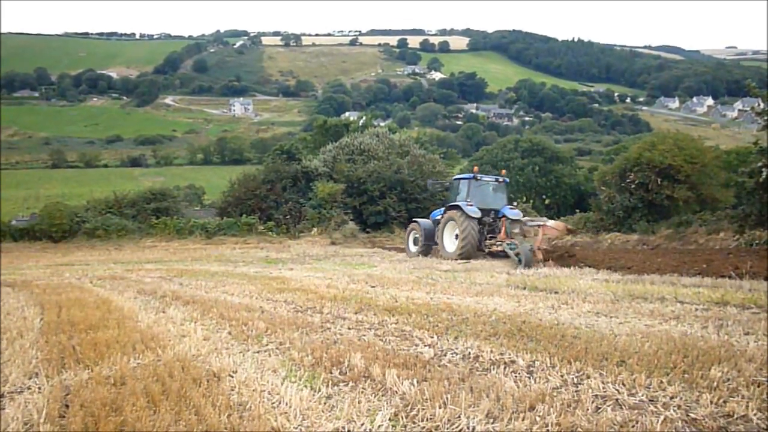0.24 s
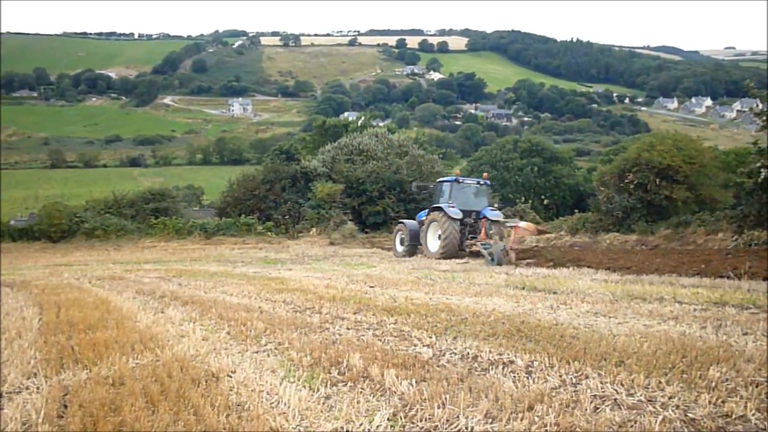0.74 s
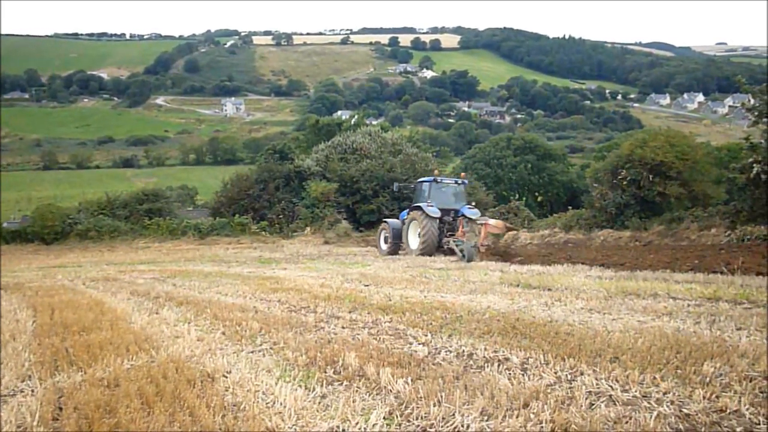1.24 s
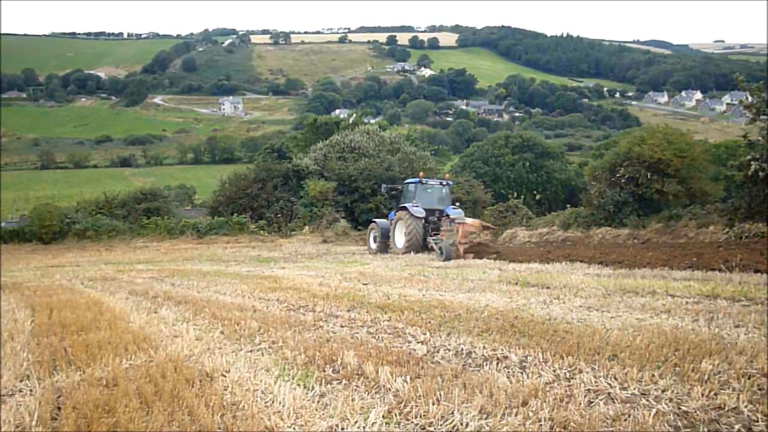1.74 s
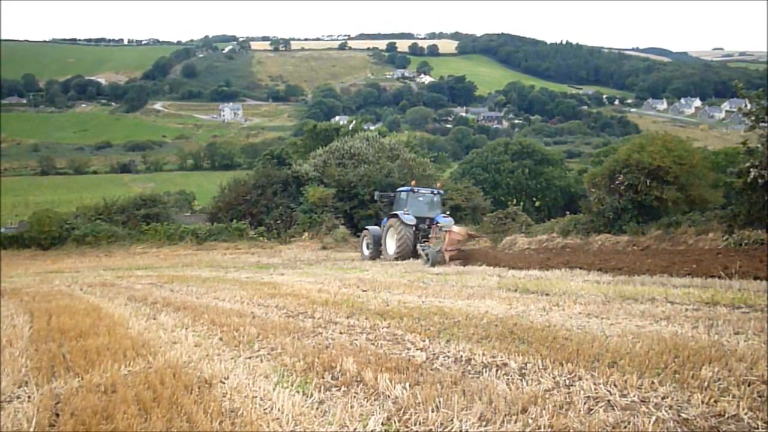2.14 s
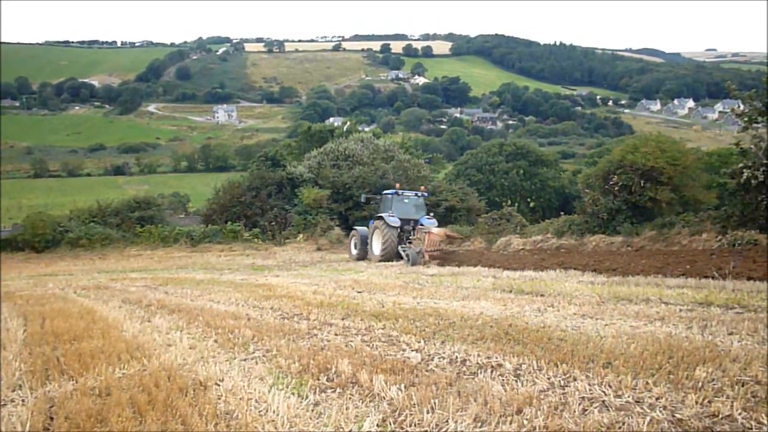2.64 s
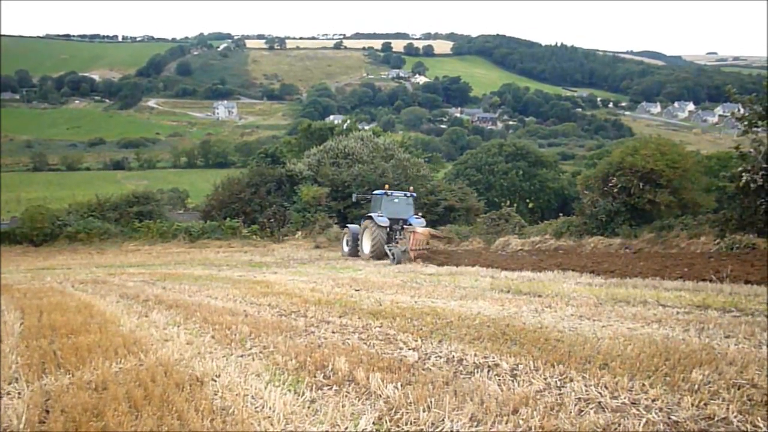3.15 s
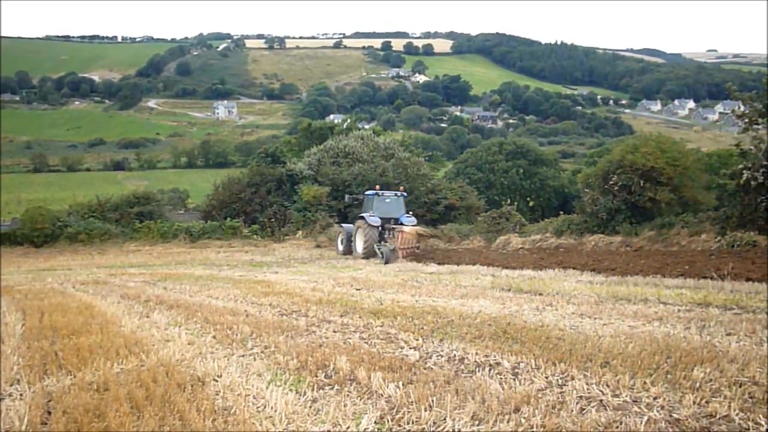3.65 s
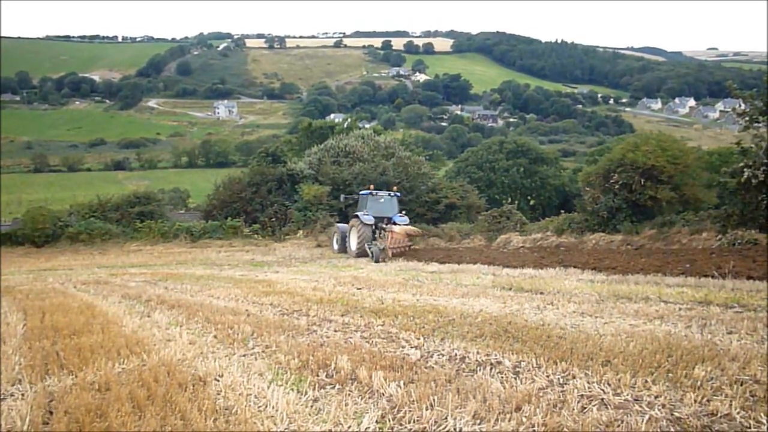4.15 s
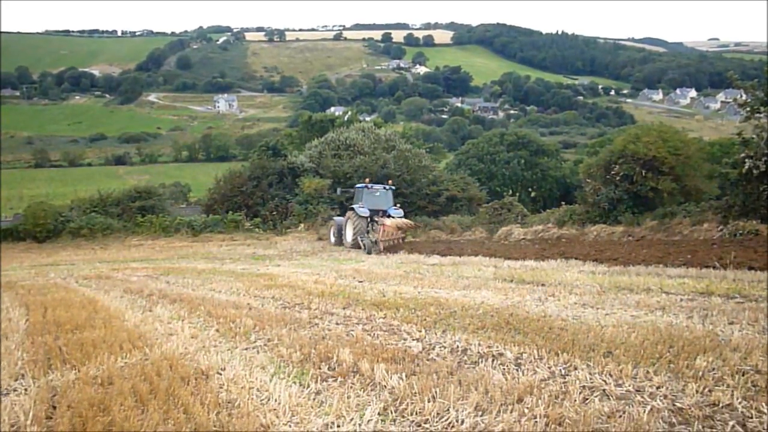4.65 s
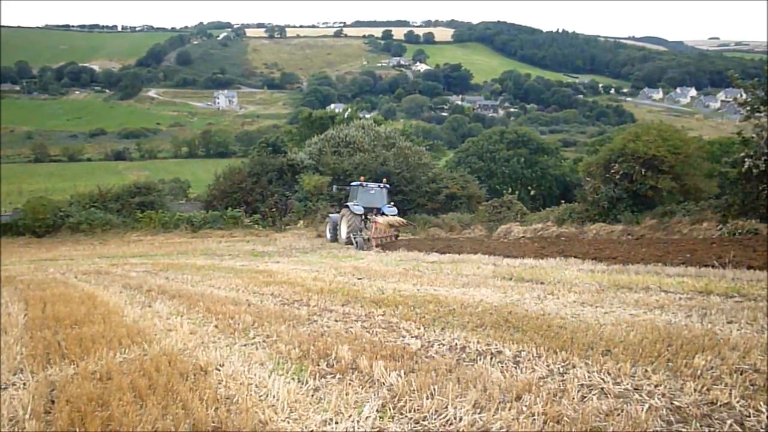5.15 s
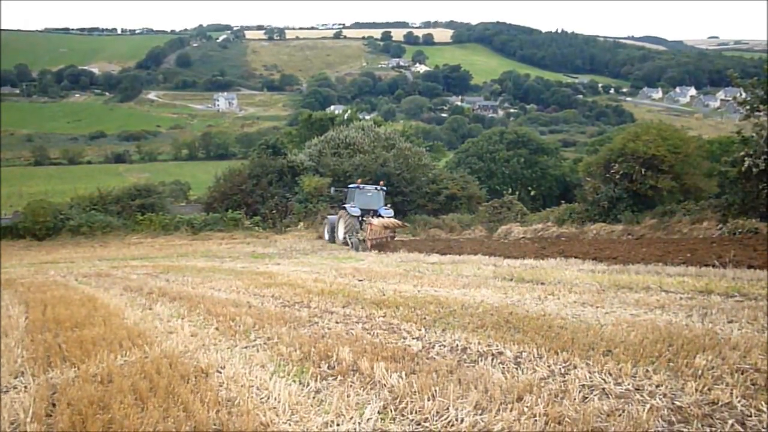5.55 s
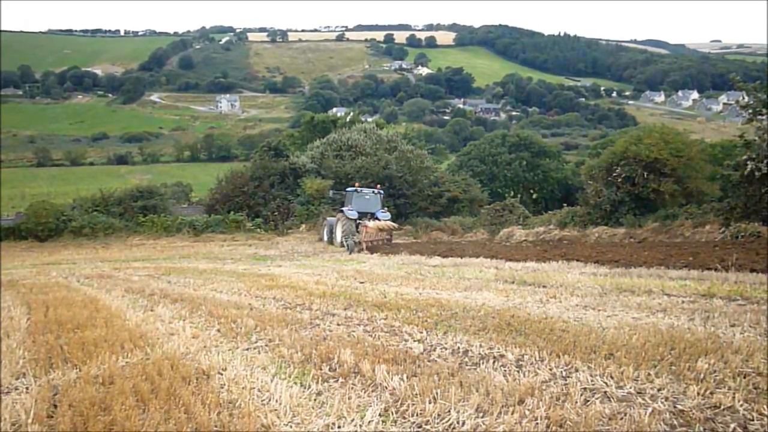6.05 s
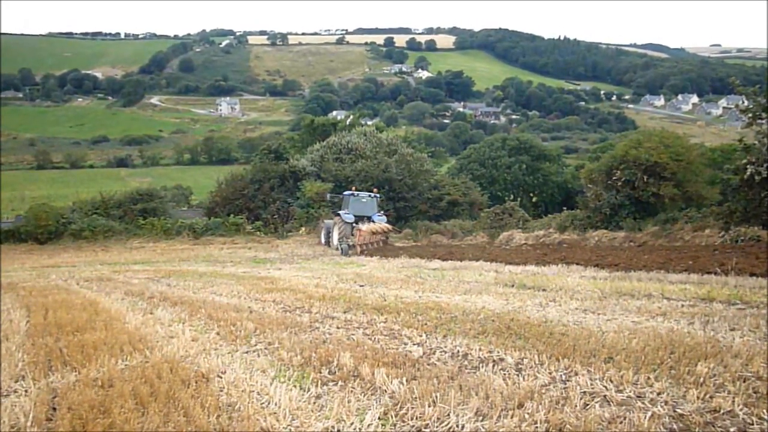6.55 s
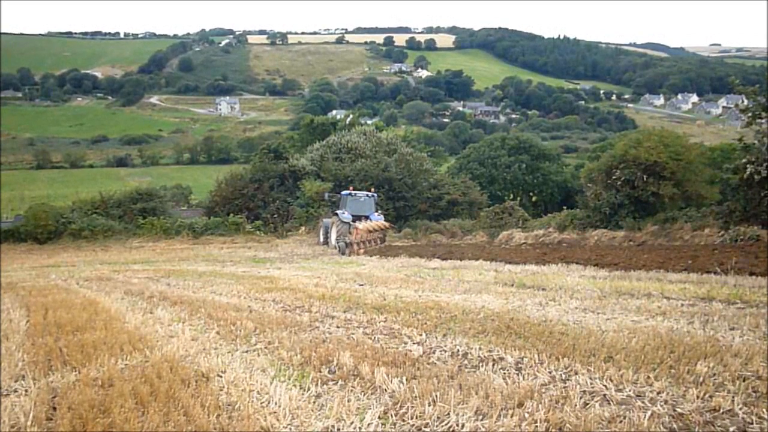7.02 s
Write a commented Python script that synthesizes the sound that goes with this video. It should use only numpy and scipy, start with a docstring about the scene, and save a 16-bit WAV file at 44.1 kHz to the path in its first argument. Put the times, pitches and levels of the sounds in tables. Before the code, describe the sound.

From the start a diesel tractor is already working hard about 25 metres away in an open field, a deep droning boom near 85-90 hertz with a rough roar and clattering block. Soil hisses and crumbles over the plough throughout. A heavier boom and stony scrape come at 0.7 s; the engine picks up slightly around 1.2, sags near 2.4 and recovers by 3. Short gritty stone knocks stand out at 3.1, 3.6, 4.6 and 5.1 s. The tractor gradually recedes, its roar changing colour as its rear turns towards the listener. Light wind freshens after 4 s, with low thumps clustered around 4.8-5.5, 6.0 and 7.0, the strongest at 5.3. From about 6.1 s the throttle eases: a brief higher hum sings at 6.4, pitch falls, and drone, clatter and soil fade until the end at 7.3. The small camera sounds narrow, with dull treble.

```python
"""In a stubble field, a six-cylinder diesel tractor pulls a plough away from the listener.
Its speed sags and recovers with the load until the driver throttles back. The exhaust drones as sine tones
and booming noise, and noise that swells at each firing makes the roar and the clattering block.
Crumbling noise hisses over the plough shares, and grains of noise ring them where they strike stones.
A freshening breeze buffets the microphone of a small camera with a narrow, notched response."""
import sys
import numpy as np
from scipy.fft import rfft, irfft, next_fast_len
from scipy.io import wavfile
from scipy.ndimage import map_coordinates

SR = 44100
rng = np.random.default_rng(int(sys.argv[2]) if len(sys.argv) > 2 else 0)


def master_out(mix):
    """Clip the mix to full scale and print it as 16-bit PCM to the path in sys.argv[1]."""
    frames = np.transpose(np.atleast_2d(mix))
    ceiling = np.clip(frames, -1, 1)
    pcm = np.round(ceiling * 32767).astype(np.int16)
    wavfile.write(sys.argv[1], SR, pcm)


N = 321048
CYLINDERS = 6
# how fast each sound dies away once the driver throttles back, in dB per second; clatter fades like the soil
BOOM_FADE, ROAR_FADE, SOIL_FADE = 12.3, 4.5, 7.5
SOIL_DB = -42.0  # soil level at the starting distance, in dB
FACING_DB_PER_S = 0.2447  # clatter and soil gain as the tractor's rear swings round towards the listener

# The firing note. Each row: time in seconds, level in dB.
NOTE_LEVELS = [(0, -28.5), (0.45, -27.5), (1.2, -27.5), (1.5, -31.5), (2.5, -29.5), (2.8, -33),
               (3.05, -28.5), (3.5, -30.5), (3.85, -33), (4.75, -32.5), (5.2, -36.5), (6.05, -32.5),
               (6.5, -50.5), (7.28, -55)]
# Exhaust tones. Each row: multiple of the four-stroke cycle, level in dB compared with the boom.
EXHAUST_TONES = [(8, -27), (10, -12.5), (11, -12), (12, -3), (13, -22), (14, -21), (15, -21), (16, -26),
                 (18, -16), (20, -22), (22, -26), (34, -27), (36, -30), (40, -35), (54, -29), (60, -31.5),
                 (66, -31), (78, -25.5)]
# Colour of the gas booming in the silencer. Each row: frequency in Hz, strength in dB per Hz.
BOOM_COLOUR = [(30, -42), (80, -11), (115, -4.5), (150, 1), (180, -5.5), (215, -5), (270, -13.5),
               (380, -27.5), (700, -53.5)]
BOOM_DB, OVERTONE_DB = -24, -47.5  # levels at the starting distance
FREE_HZ, FULL_LOAD_HZ = 88.8, 86.5  # firings per second running light and pulling hard
LOAD_DB = 2  # extra boom when pulling hard
HEAVY_S, HEAVY_LENGTH_S, HEAVY_DB = 0.73, 0.29, 2  # a heavy patch of ground makes the exhaust boom
SING_S, SING_LENGTH_S, SING_DB = 6.4, 0.23, 11  # the fourth harmonic sings out as the engine slows


def exhaust(cycle, firing_hz):
    """Firing note, its overtone, tones of unequal cylinders, and gas that booms harder under load."""
    load = np.clip((FREE_HZ - firing_hz) / max(FREE_HZ - FULL_LOAD_HZ, 1), 0, 1)
    note_db, = curves(NOTE_LEVELS)
    boom_db = level(BOOM_DB, BOOM_FADE) + LOAD_DB * load
    boom_db = boom_db + HEAVY_DB * swell(HEAVY_S, HEAVY_LENGTH_S) + .7 * wobble(22)
    overtone_db = level(OVERTONE_DB, ROAR_FADE) + SING_DB * swell(SING_S, SING_LENGTH_S)
    note = tone(cycle, CYLINDERS, waver_db=0.8, drift=0.23)
    overtone = tone(cycle, 4 * CYLINDERS, waver_db=1, drift=0.3)
    tones = np.zeros(N)
    for order, db in EXHAUST_TONES:
        # the higher the order, the more the air shakes it, up to a limit
        waver_db = min(order * 0.11, 3)
        drift = min((order / 32) ** 2, 1)
        tones += amp(db) * tone(cycle, round(order), waver_db, drift)
    gas = coloured(bursts(cycle, depth=0.25), BOOM_COLOUR)
    boom = tones + amp(-8.5) * gas
    return amp(note_db) * note + amp(overtone_db) * overtone + amp(boom_db) * boom


# Belt-driven fan and pump. Each row: multiple of the four-stroke cycle, level in dB compared with the roar.
BELT_TONES = [(11.25, -1.5), (24.9, -17)]
# Colour of the ringing block. Each row: frequency in Hz, strength in dB per Hz.
CLATTER_COLOUR = [(800, -14), (1500, -5), (1900, 7), (2300, -0.5), (2570, 7.5), (2810, -10.5), (3050, 5.5),
                  (3400, -5.5), (3700, 1.5), (4100, -13), (5000, -9.5), (7500, -43.5)]
ROAR_DB, CLATTER_DB = -30.5, -40  # settings for the starting distance


def machinery(cycle):
    """Knocks that recur each cycle blend with turbulent roar, belt-driven tones and the ringing block."""
    roar_db = level(ROAR_DB, ROAR_FADE)
    clatter_db = level(CLATTER_DB, SOIL_FADE) + FACING_DB_PER_S * np.arange(N) / SR
    knocks = sum(tone(cycle, order, waver_db=3, drift=.7) for order in range(16, 96))
    roar = roar_colour(bursts(cycle, depth=0.15) + amp(-15) * unit(knocks))
    belt = sum(amp(db) * tone(cycle, order, waver_db=1.5, drift=.4) for order, db in BELT_TONES)
    clatter = coloured(bursts(cycle, depth=0.07), CLATTER_COLOUR) * amp(1.1 * wobble(14))
    return amp(roar_db - 1.0) * roar + amp(roar_db) * belt + amp(clatter_db) * clatter


# Roar heard from the tractor's flank. Each row: frequency in Hz, strength in dB per Hz.
FLANK_COLOUR = [(100, -17), (250, -4.5), (340, 2), (410, 0), (490, 2.5), (570, -1.5), (720, 4), (820, -3),
                (930, -0.5), (1050, -1.5), (1180, 1), (1400, -3), (2000, -3.5), (4000, -33.5)]
# Roar heard from behind. Each row: frequency in Hz, strength in dB per Hz.
REAR_COLOUR = [(100, -21), (250, 8), (340, -2.5), (410, 2), (490, 2), (660, 4.5), (780, -4.5), (910, 4),
               (1040, -1), (1170, 3.5), (1320, -3.5), (2000, -15.5), (4000, -36)]


def roar_colour(source):
    """The colour of the roar shifts steadily as the tractor turns its back."""
    away = np.linspace(0, 1, N)
    flank = coloured(source, FLANK_COLOUR)
    rear = coloured(source, REAR_COLOUR)
    return unit((1 - away) * flank + away * rear)


# Colour of the soil hiss. Each row: frequency in Hz, strength in dB per Hz.
SOIL_COLOUR = [(800, -15.5), (2000, 4.5), (3500, 4.5), (4800, 2.5), (5600, 1), (6400, 0.5), (7100, -3.5),
               (7600, -12), (8000, -30)]


def plough():
    """Soil and stubble crumble over the shares in uneven clods, as noise of jumpy strength."""
    soil_db = level(SOIL_DB, SOIL_FADE) + FACING_DB_PER_S * np.arange(N) / SR
    unevenness_db = 1.14 * wobble(25) + 0.51 * wobble(5.2)
    crumbs = rng.standard_normal(N) * amp(1.6 * wobble(500))
    return amp(soil_db + unevenness_db) * coloured(crumbs, SOIL_COLOUR)


# Large stones scraping over the shares. Each row: start in seconds, average (rms) level in dB at the top,
# centre in Hz, spread in octaves, time to the top in seconds.
LARGE_STONES = [(0.085, -35, 4400, .45, .004), (0.704, -31.5, 1500, 1.6, .006),
                (0.723, -26.5, 1150, 1.6, .008), (1.212, -38, 2800, .4, .004),
                (1.817, -40.5, 5000, .13, .006), (3.012, -40, 1850, .2, .005),
                (3.1, -33.5, 3500, .5, .0025), (3.118, -28, 3000, .85, .0035), (3.197, -38, 5200, .4, .006),
                (3.553, -33.5, 1500, 1, .006), (4.025, -37, 3700, .12, .004), (4.195, -40, 3800, .6, .02),
                (4.421, -37, 2500, .4, .004), (4.553, -38, 2600, .2, .009), (4.606, -32.5, 3700, 1, .006),
                (4.637, -34.5, 3800, .6, .0035), (5.065, -35.5, 4300, .22, .004),
                (5.121, -35.5, 2500, .5, .005), (5.198, -38, 2500, .6, .005), (5.795, -41, 4200, .4, .012),
                (5.99, -42, 4200, .4, .005), (6.32, -42, 3700, .4, .003), (6.352, -37, 2500, .4, .004),
                (6.4, -43, 3500, .4, .004), (6.469, -39, 2550, .2, .004), (6.83, -46, 3500, .4, .004),
                (7.215, -43, 2800, .4, .006)]


def stones():
    """Large stones scrape over the shares, with 45 small pebbles at random times between them."""
    track = np.zeros(N)
    soil_db = level(SOIL_DB, SOIL_FADE)
    for start, db, centre_hz, spread, rise in LARGE_STONES:
        add(track, start, amp(db) * scrape(centre_hz, spread, rise))
    for when, weight, pitch in rng.random(size=(45, 3)):
        db = soil_db[int(when * N)] - 7 + 5 * weight
        pebble = scrape(2400 + 3000 * pitch, spread=.4, rise=0.0046)
        add(track, when * N / SR, amp(db) * pebble)
    return track


# Ringing of the soil-damped shares and their frame. Each row: frequency in Hz, width in Hz, strength in dB.
SHARE_RINGING = [(520, 160, 5), (790, 160, 3), (1170, 160, 1), (1830, 120, 2), (2570, 130, -2),
                 (3090, 150, 1), (3720, 170, -2), (4290, 200, -4), (4680, 170, -7), (5080, 180, -9),
                 (5450, 170, -8), (6350, 260, -14)]


def scrape(centre_hz, spread, rise):
    """A stone grinds briefly over a share and rings mostly the modes within spread octaves of its centre."""
    t = np.arange(SR // 8) / SR
    hz = np.fft.rfftfreq(len(t), 1 / SR)
    steel = 0
    for mode_hz, width_hz, db in SHARE_RINGING:
        closeness = np.exp(-.5 * (np.log2(mode_hz / centre_hz) / spread) ** 2)
        steel = steel + amp(db) * closeness * resonance(hz, mode_hz, width_hz)
    air = 1 / (1 + (hz / 6800) ** 6)  # takes off the top treble
    pressure = t / rise * np.exp(1 - t / rise)  # peaks at 1 after the rise time
    grit = rng.standard_normal(len(t)) * amp(8 * rng.standard_normal(len(t)))
    ring = irfft(rfft(grit * pressure) * steel * air, len(t))
    return unit(ring) * np.sqrt(np.mean(pressure ** 2))


def resonance(hz, centre_hz, width_hz):
    """Response of one damped mode, 1 at its centre."""
    return 1j * hz * width_hz / (centre_hz ** 2 - hz ** 2 + 1j * hz * width_hz)


# Puffs on the microphone. Each row: start in seconds, peak in dB, pitch in Hz reached 3 ms after the start.
WIND_PUFFS = [(0.764, -15, 150), (4.126, -18, 95), (4.206, -15.5, 125), (4.424, -17, 72),
              (4.807, -16.5, 260), (4.827, -15, 130), (4.888, -19, 170), (4.988, -19, 75), (5.013, -17, 95),
              (5.282, -10.5, 215), (5.295, -17, 95), (5.524, -13, 120), (6.01, -17, 85), (6.041, -14, 90),
              (6.09, -18, 120), (6.122, -15, 220), (6.973, -14.5, 125), (6.991, -15.5, 135)]
PUFF_SWINGS, PUFF_T60_S = 14, .08  # swings, and seconds, that each take 60 dB off a puff; both act together


def wind():
    """Low buffeting noise, with single puffs that shove the diaphragm and let it swing back."""
    # each pair: frequency in Hz, strength in dB per Hz
    eddy_colour = [(10, -25.0), (25, -8.5), (42, -2.5), (100, -3.5), (180, -8.5), (350, -22.5), (1200, -51.5)]
    eddies = coloured(rng.standard_normal(N), eddy_colour)
    track = breeze() * eddies
    t = np.arange(SR // 10) / SR
    for start, db, hz in WIND_PUFFS:
        swings = hz * 0.018 * np.log1p(t / .015)  # the swing slows as the eddy passes
        onset = 1 - np.exp(-t / .0006)
        decay = amp(-60 * swings / PUFF_SWINGS - 60 * t / PUFF_T60_S)
        shove = np.sin(2 * np.pi * swings) * onset * decay
        add(track, start, amp(db) * shove / np.abs(shove).max())
    return track


# Gusts. Each row: time of the top in seconds, strength in dB, time constant of dying away in seconds.
BREEZE_GUSTS = [(0.41, -32, .07), (0.76, -33, 0.078), (1.38, -33, .08), (2.3, -39.5, .15),
                (2.84, -42.5, .05), (4.43, -35, .04), (4.63, -35, 0.07), (4.82, -36, .06),
                (5.03, -33.5, 0.063), (5.3, -34, .04), (5.5, -40, .04), (5.84, -35.5, .04),
                (6.04, -33, .07), (6.18, -35.5, 0.054), (6.8, -36, 0.076), (6.98, -34, .08),
                (7.22, -37, .1)]
CALM_DB, FRESH_DB, FRESHENS_S = -49, -45, 4.1  # between gusts, before and after the breeze picks up
GUST_RISE_S = 0.056


def breeze():
    """Strength of the buffeting: a restless base that freshens, and gusts that rise quickly and die away."""
    t = np.arange(N) / SR
    base_db = np.interp(t, [FRESHENS_S - GUST_RISE_S, FRESHENS_S], [CALM_DB, FRESH_DB])
    strength = amp(base_db + 2.7 * wobble(7.1))
    for top, db, release in BREEZE_GUSTS:
        strength += amp(db) * np.exp(-np.maximum((top - t) / GUST_RISE_S, (t - top) / release))
    return strength


START_M, AWAY_M_PER_S = 25, 3.8  # the tractor's distance at first, and how fast it grows
THROTTLE_BACK_S = 6.12  # from here on the engine sounds fade faster


def level(db, fade):
    """Level in dB: it falls with distance, and by a further fade dB a second once the throttle closes."""
    t = np.arange(N) / SR
    distance_loss = 20 * np.log10(1 + AWAY_M_PER_S * t / START_M)
    return db - distance_loss - fade * np.maximum(t - THROTTLE_BACK_S, 0)


def swell(s, length):
    """A smooth rise to 1 at time s and back, about length seconds each way."""
    return np.exp(-((np.arange(N) / SR - s) / length) ** 2)


def tone(cycle, order, waver_db, drift):
    """A sine at a multiple of the engine cycle, shaken in level and phase by the moving air."""
    strength = np.sqrt(2) * amp(waver_db * wobble(5))
    phase = 2 * np.pi * (order * cycle + rng.random()) + drift * wobble(7)
    return strength * np.sin(phase)


def bursts(cycle, depth):
    """Noise that swells at every firing."""
    return unit(rng.standard_normal(N) * (1 + depth * np.cos(2 * np.pi * CYLINDERS * cycle)))


def amp(db):
    """Decibels to gain."""
    return 10 ** (np.asarray(db) / 20)


def unit(x):
    """Scale to an average (rms) level of 1."""
    return x / np.sqrt(np.mean(x ** 2) + 1e-20)


def curves(rows):
    """One value per sample for each column after the time."""
    s, *cols = np.transpose(rows)
    return [np.interp(np.arange(N) / SR, s, c) for c in cols]


def wobble(rate):
    """A smooth random curve through rate random points a second."""
    points = rng.standard_normal(int(N * rate / SR) + 4)
    return map_coordinates(points, [np.arange(N) * rate / SR])


def filtered(x, response):
    """Multiply the spectrum of x by a response, given as a function of frequency."""
    size = next_fast_len(N + SR // 2)
    hz = np.fft.rfftfreq(size, 1 / SR)
    return irfft(rfft(x, size) * response(hz), size)[:N]


def coloured(x, spectrum):
    """Filter x by rows of frequency in Hz and dB, then scale it to rms 1."""
    f, db = np.transpose(spectrum)
    return unit(filtered(x, lambda hz: amp(np.interp(np.log(hz + 1), np.log(f), db))))


def add(track, s, sound):
    """Mix a sound into the track at time s."""
    part = track[round(s * SR):][:len(sound)]
    part += sound[:len(part)]


# Engine speed. Each row: time in seconds, firings per second.
ENGINE_SPEED = [(0.0, 88), (0.15, 84.8), (0.3, 84.8), (0.47, 87), (0.95, 87.1), (1.2, 90.6), (1.35, 90.1),
                (1.5, 86.9), (1.8, 87.9), (1.95, 85.6), (2.22, 85.2), (2.42, 80.5), (2.7, 85.5), (3.05, 89),
                (3.75, 87.9), (4.22, 88.9), (4.55, 85), (4.82, 88), (5.2, 82.3), (5.5, 85.3), (5.85, 84.9),
                (6.0, 83.4), (6.35, 83), (6.68, 78.3), (7.28, 76.8)]


def scene():
    """The crankshaft times the engine sounds; plough, stones and wind join them."""
    firing_hz, = curves(ENGINE_SPEED)
    cycle = np.cumsum(firing_hz) / CYLINDERS / SR  # four-stroke cycles so far
    tractor = exhaust(cycle, firing_hz) + machinery(cycle)
    return (tractor + plough() + stones() + wind())[None]


# The camera's dead bands. Each row: centre in Hz, width in Hz.
DEAD_BANDS = [(1410, 198), (1603, 770), (2160, 290)]
TOP_HZ = 8050  # nothing passes above this


def record(dry):
    """The camera thins the deepest bass, cuts three bands out of the middle and stops at its top limit."""
    def camera(hz):
        response = (1j * hz / (1j * hz + 22)) ** 2  # low cut
        for centre, width in DEAD_BANDS:
            gap = centre * centre - hz * hz
            response = response * gap / (gap + 1j * hz * width)
        return response * np.clip((TOP_HZ - hz) / 450, 0, 1)

    return filtered(dry[0], camera)[None]


dry = scene()
out = record(dry)
master_out(out)
```